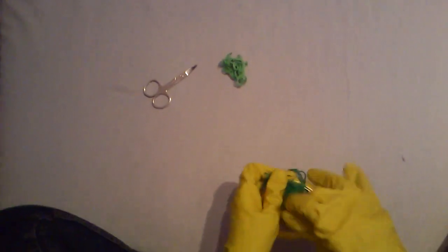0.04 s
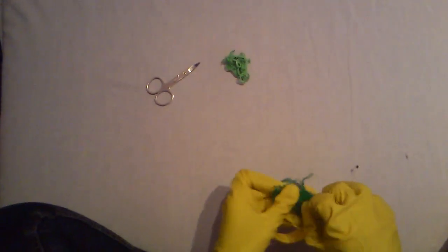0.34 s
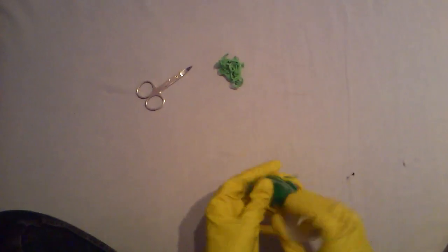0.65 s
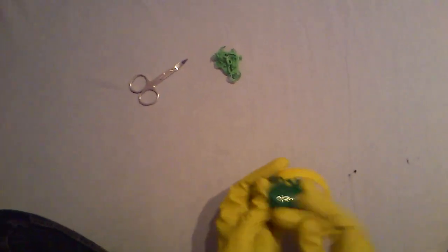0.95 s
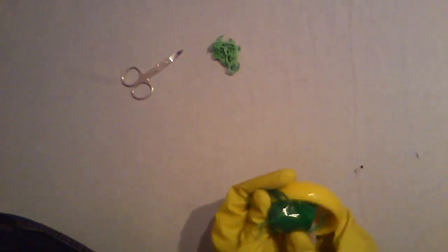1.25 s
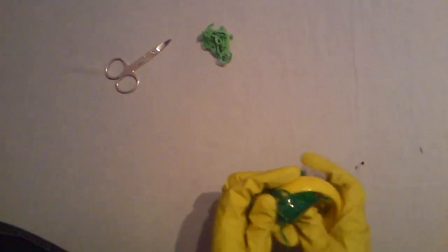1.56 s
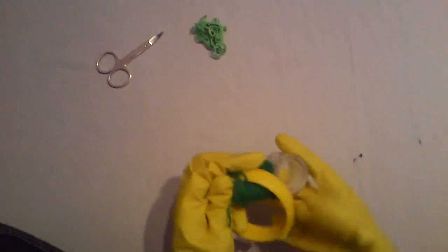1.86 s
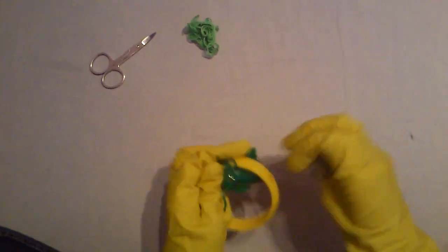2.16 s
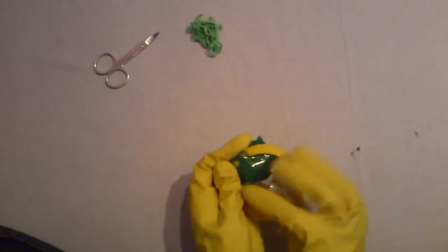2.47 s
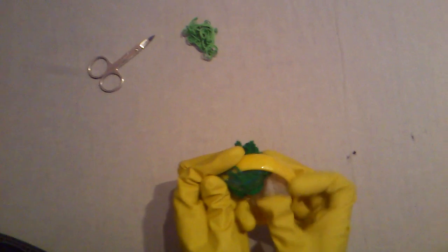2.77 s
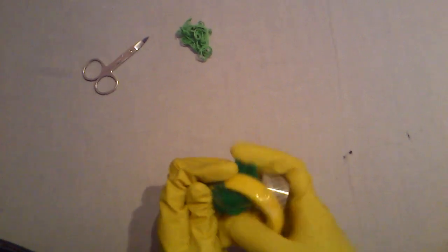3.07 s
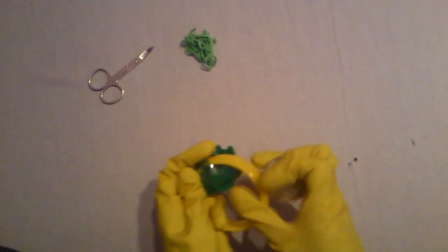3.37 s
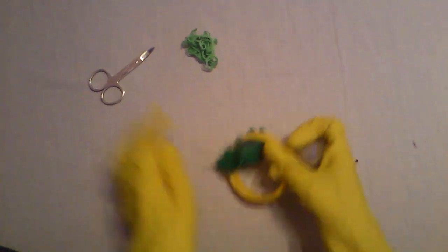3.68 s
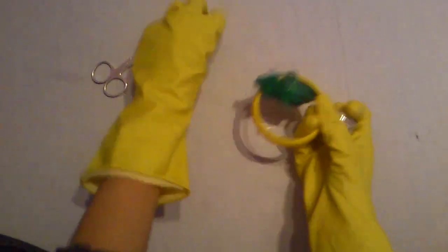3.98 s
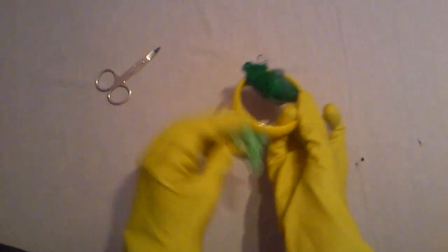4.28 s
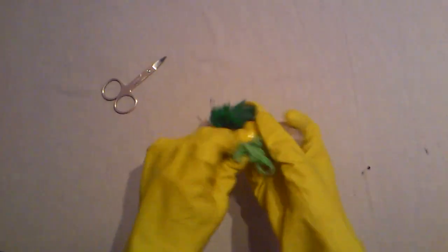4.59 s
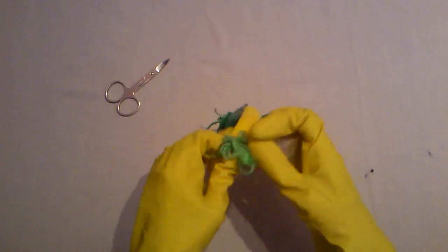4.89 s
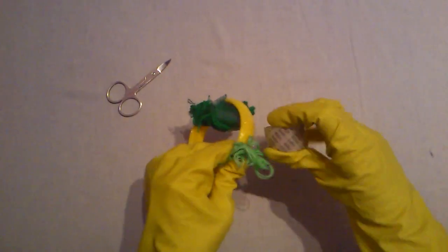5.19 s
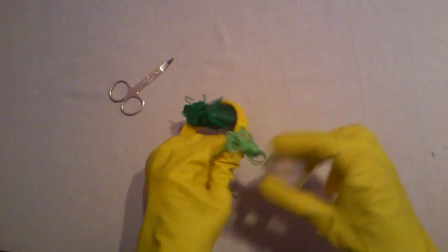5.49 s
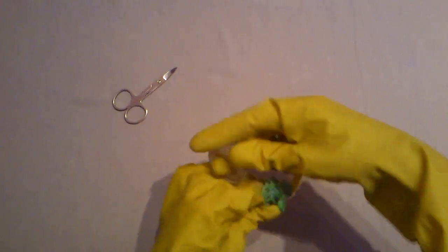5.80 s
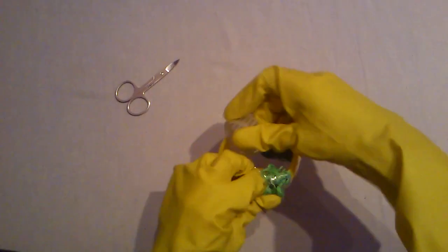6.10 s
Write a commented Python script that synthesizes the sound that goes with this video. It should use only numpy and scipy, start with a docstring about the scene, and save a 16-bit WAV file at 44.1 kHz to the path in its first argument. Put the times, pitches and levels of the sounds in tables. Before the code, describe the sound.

Rubber-gloved hands work with sticky tape and a plastic ring close to the microphone, making bright, irregular snaps, many with a hollow note, over faint crinkling. It opens with a quick rubbery slip and several snaps, with light knocks around 0.7 seconds. Quieter ticks follow until a sharp snap at 1.8. At about 2.2 seconds tape comes off in a very short, jerky rip. Crisp cracks and stuttering glove slips cluster from 2.9 to 3.5. At 4 seconds a hand thuds softly on the cloth-covered table, followed by a lull with small ticks. The snaps build again from 5.2, with a second brief rip, falling in pitch, at 5.4 and a few more cracks until 5.7. Faint clicks finish at around 6.3 seconds. The small bare room adds a short echo, with steady low rumble, hiss and a faint hum underneath.

```python
"""Rubber gloves and sticky tape

A small bare room, a near-coincident stereo microphone at a cloth-covered table. Gloved hands bind
thread to a plastic ring with tape. Rubber and tape stick and let go: runs of slips, a faint crinkle,
single snaps and two longer rips, each a bright crack plus the hollow note of a fold. The hands knock
on ring and table, once while reaching for more thread. Ceiling and walls answer over a low room tone."""
import sys
import numpy as np
from scipy import signal
from scipy.fft import rfft, irfft
from scipy.io import wavfile
from scipy.ndimage import uniform_filter1d

SR = 44100
rng = np.random.default_rng(int(sys.argv[2]) if len(sys.argv) > 2 else 0)


def put_to_file(sound):
    """Save the sound as 16-bit audio at rate SR, in the file named by the first command-line argument."""
    columns = np.atleast_2d(sound).T  # one column per channel
    safe = np.clip(columns, -1, 1)
    whole_steps = np.round(safe * 32767)
    wavfile.write(sys.argv[1], SR, whole_steps.astype(np.int16))


N = 279594
LEAD, GRAIN = SR // 10, 1024  # samples: run-in before t = 0, length of one release


def undb(db):
    """Decibels to gain."""
    return 10 ** (np.asarray(db) / 20)


def on_log_axis(hz, points, values):
    """Join the points of a spectrum by straight lines on a log-frequency axis."""
    return np.interp(np.log(hz + 1), np.log(points), values)


def resonance(hz, centre, q):
    """Response of a two-pole band-pass, gain 1 at the centre."""
    s = 1j * hz / centre
    return s / q / (1 + s / q + s * s)


def minimum_phase(db):
    """Causal response with the given gains, so nothing rings ahead of a crack."""
    cepstrum = irfft(np.log(undb(db)))
    half = cepstrum.shape[-1] // 2
    cepstrum[..., 1:half] *= 2
    cepstrum[..., half + 1:] = 0
    return np.exp(rfft(cepstrum))


def place(times, grains):
    """Lay short sounds on a track that starts LEAD samples early."""
    track = np.zeros(LEAD + N + GRAIN)
    for i, grain in zip(np.clip(times * SR + LEAD, 0, LEAD + N).astype(int), grains):
        track[i:i + GRAIN] += grain
    return track[:LEAD + N]


# Noise floor at the microphone: f/Hz, relative density/dB
NOISE_FLOOR = [(12, -24), (20, 1.5), (65, -0.5), (215, -7), (620, -10.5), (969, -17), (1110, -13.5),
               (1250, -18.5), (1350, -18.5), (2180, -18), (2500, -18), (3400, -27.5), (4020, -20.5),
               (8790, -32), (15800, -33)]


def room_tone(noise_db=-54.5, hum_hz=175, hum_db=-67.5):
    """Steady low rumble, microphone hiss and a faint hum."""
    hz = np.fft.rfftfreq(N, 1 / SR)
    colour = undb(on_log_axis(hz, *np.transpose(NOISE_FLOOR)))
    noise = irfft(rfft(rng.standard_normal(N)) * colour, N)
    hum = np.sqrt(2) * np.sin(2 * np.pi * hum_hz * np.arange(N) / SR)
    return undb(noise_db) * noise / noise.std() + undb(hum_db) * hum


def release(response, db, peel_s, jolt, ripple):
    """A jolt and a brief peeling noise through each response, direct and diffuse; db is rms over 5 ms."""
    peel = rng.standard_normal((len(db), GRAIN)) * np.exp(-(np.arange(GRAIN) / SR / peel_s) ** 2)
    # the walls gather sound from all directions, which evens out much of the ripple of any one path
    grains = np.array([irfft((jolt + share * rfft(peel)) * response) for share in (1, ripple)])
    power = np.sum(grains ** 2, axis=-1, keepdims=True) / (.005 * SR)
    return grains * undb(db) / np.sqrt(power)


# Spectrum of taut skin cracking: f/Hz, relative level/dB
SKIN_SPECTRUM = [(300, -55), (700, -12), (1300, -11), (2400, -8.5), (3500, -10.5), (4800, -4), (6500, -1.5),
                 (8500, -7), (11000, -20.5), (15500, -37)]


def skin_and_fold(rows, taut_db=2, taut_q=6, fold_q=5.03, leak_db=-22):
    """Each row (as in SINGLE_SNAPS) cracks taut skin and rings a slack fold: direct sound, room send."""
    t, crack_db, crack_hz, tilt_db, fold_db, fold_hz, send_db = np.asarray(rows, float).T[:, :, None]
    hz = np.arange(GRAIN // 2 + 1) * SR / GRAIN
    octaves = np.log2(np.clip(hz, 2300, 11000) / 6000)
    skin = minimum_phase(on_log_axis(hz, *np.transpose(SKIN_SPECTRUM)) + tilt_db * octaves)
    skin = skin * (1 + undb(taut_db) * resonance(hz, crack_hz, taut_q))
    # a fold is too small to radiate much below its own note
    radiated_power = 1 / (1 + (.65 * fold_hz / (hz + 60)) ** 6) + undb(2 * leak_db)
    radiation = minimum_phase(10 * np.log10(radiated_power))
    fold = resonance(hz, fold_hz, fold_q) * resonance(hz, fold_hz, q=0.16) * radiation
    cracks = release(skin, crack_db, peel_s=0.003, jolt=3.86, ripple=0.29)
    notes = release(fold, fold_db, peel_s=0.0034, jolt=3.7, ripple=0.4)
    direct, diffuse = cracks + notes
    return np.array([place(t[:, 0], direct), place(t[:, 0], diffuse * undb(send_db))])


# Glove drags; those facing away from the microphone arrive mostly through the room:
# t/s, length/s, slip rate/Hz, first level/dB, last level/dB, crack f/Hz, tilt/(dB per octave),
# fold over crack/dB, fold f/Hz, room send/dB
GLOVE_DRAGS = [(-.03, 0.045, 510, -26.5, -41, 5600, -1, -17, 1800, 8.5),
               (0.255, 0.014, 443, -64, -35, 4050, -7, -14, 1540, 8.5),
               (0.444, 0.011, 303, -51, -51, 5960, 1, 3.5, 2400, 10),
               (0.702, 0.055, 310, -38.5, -41, 4000, -3, -25, 1380, 6.5),
               (1.6562, 0.024, 120, -41.5, -32, 8000, 17, -4.5, 1980, -1),
               (2.156, .019, 530, -24.5, -20, 5700, -2.5, -4, 1650, 2),
               (2.92, 0.017, 225, -33.5, -18.5, 7000, 1, -10, 1940, 1.5),
               (3.1403, 0.053, 63, -31, -22, 6400, -2, -24, 1950, -3.5),
               (3.216, 0.031, 440, -32, -32, 5600, 0, -11, 2110, -1),
               (3.3684, .017, 244, -23, -21.5, 6540, 5, -12, 2600, -0.5),
               (5.2004, .016, 215, -24, -22, 4523, 3.5, -28, 2110, 0.5),
               (5.2345, 0.011, 217, -24, -29.5, 6826, 8, -9, 2640, -8),
               (5.3173, .031, 119, -24.5, -28, 6440, 3.5, -8, 2540, -2.5),
               (5.3587, .017, 160, -23, -21.5, 6300, 5, -10, 2560, -3),
               (5.726, 0.015, 353, -42, -31.5, 4310, -20, 1.5, 680, -2),
               (5.728, .025, 657, -32.5, -28.5, 4270, -3.5, -10, 1062, 7)]


def drags(uneven_s=.0006, scatter_db=1.5):
    """Rubber sticks and slips: a quick, uneven run of releases for each drag."""
    slips = []
    for start, length, rate, first_db, last_db, crack_hz, tilt, fold_db, fold_hz, send in GLOVE_DRAGS:
        chance = rng.standard_normal((40, 4))
        for k, (late, size, taut, slack) in enumerate(chance[:int(length * rate) + 1]):
            t = start + k / rate + uneven_s * late
            db = first_db + (last_db - first_db) * k / (length * rate) + scatter_db * size
            slips.append((t, db, crack_hz * np.exp(0.16 * taut), tilt,
                          db + fold_db, fold_hz * np.exp(0.02 * slack), send))
    return skin_and_fold(slips)


# Spells of light finger work over the table: t/s, length/s, relative level/dB
FINGER_WORK = [(0, 0.51, -45.5), (0.874, 0.25, -53.5), (1.327, 0.43, -50), (1.947, 0.77, -49.5),
               (3.0, 0.27, -49.5), (3.66, 0.048, -50.5), (4.062, 0.17, -54.5), (4.412, 0.3, -56),
               (4.876, 0.15, -54), (5.552, 0.43, -50), (6.054, 0.076, -50)]


def crinkle(count=600, fade_s=0.033, rest_db=-63.5, scatter_db=5.5, fold_db=-6, send_db=2.0):
    """Many tiny releases of every pitch, swelling with each spell and barely there as the fingers rest."""
    late, size, taut, slack, hollow = rng.standard_normal((count, 5)).T
    t = (np.arange(count) + .5 * late) / count * N / SR
    start, length, spell_db = np.transpose(FINGER_WORK)[:, :, None]
    resting = np.clip(np.maximum(start - t, t - start - length) / fade_s, 0, 1)
    busy_db = np.max(spell_db + (rest_db - spell_db) * resting, axis=0)
    db = busy_db + scatter_db * np.minimum(size, 2) - 6
    crack_hz, tilt = 5600 * np.exp(0.23 * taut), 4.7 * taut - 1  # tauter is higher and brighter
    fold_hz = 1300 * np.exp(0.54 * slack)
    columns = [t, db, crack_hz, tilt, db + fold_db + 3 * hollow, fold_hz, np.full(count, send_db)]
    return skin_and_fold(np.column_stack(columns))


# Rubber or tape letting go over the table:
# t/s, crack level/dB, crack f/Hz, tilt/(dB per octave), fold level/dB, fold f/Hz, room send/dB
SINGLE_SNAPS = [(0.2037, -29.5, 7200, -2, -37.5, 2500, 1), (0.2525, -29.5, 5620, 0, -24, 1390, -2.5),
                (0.3683, -45, 5810, 4, -48, 2210, 4), (0.4471, -36, 6170, 11, -36, 1190, 2.5),
                (0.6327, -26.5, 5620, -6, -34, 1520, 1.5), (0.6931, -26, 6650, 5, -27, 1480, -2),
                (0.7288, -49, 4910, -6, -25, 1180, -3), (0.7382, -25.5, 4090, -9, -32, 2060, -4),
                (1.057, -51, 7040, 5, -49, 1840, 2), (1.1212, -65, 6900, -4, -39, 1050, -1),
                (1.3195, -48, 4260, -20, -44, 1350, -1), (1.3538, -43, 4870, -5, -52, 1870, -1.5),
                (1.4147, -38.5, 6500, 3, -57, 1910, 1), (1.5242, -43.5, 6350, -4, -53, 1890, 1.5),
                (1.5816, -33.5, 7450, -3, -42.5, 1930, 2), (1.5918, -33, 6330, -4.5, -49, 1950, 1),
                (1.8226, -50, 4500, 0, -35, 2300, -5.5), (1.8318, -22.5, 4100, -6.5, -28, 1500, -1.5),
                (2.0606, -27.5, 4284, -5, -34.5, 1947, -0.5), (2.1100, -24.5, 3440, 1, -22.5, 1860, -3.5),
                (2.1211, -21, 3510, -3, -27, 1880, 0), (2.428, -29, 6270, 11, -37, 2100, -.5),
                (2.5511, -40.5, 6050, -6, -51, 915, -12), (2.5712, -48, 5900, 2, -45.5, 1920, 1),
                (2.791, -49.5, 5330, -1, -57, 1930, 5.5), (2.8663, -40.5, 5230, -1.5, -63, 1748, -1),
                (2.91, -41, 5430, -5, -52, 1900, -1), (2.94, -16.5, 7300, -5, -38, 1980, -8.5),
                (3.0820, -37, 4540, -6, -63, 1850, 2.5), (3.1287, -23, 5556, 0.5, -29.5, 1710, -.5),
                (3.1617, -22, 6060, 2, -47, 1703, 0.5), (3.3615, -26, 6686, 3, -59, 2060, 5),
                (3.5315, -30, 5030, -0.5, -30, 2440, -2.5), (3.6706, -44, 4840, -1.5, -53, 2016, -3.5),
                (4.0018, -41, 3830, -22, -39.5, 750, 0), (4.119, -43, 4360, -23, -47.5, 2100, 0.5),
                (4.7636, -47, 5500, -8.5, -51, 1940, -0.5), (4.9187, -32.5, 6750, 6, -68, 2730, -8),
                (4.9331, -32.5, 6740, 8.5, -58, 1413, 2.5), (5.0220, -54, 8050, 4, -44, 1670, -2),
                (5.1171, -35.5, 6650, 2, -68, 1880, -2.5), (5.1575, -58, 6038, 0, -43.5, 1862, 2),
                (5.1855, -36, 6900, 7, -46, 1798, 8), (5.4059, -18.5, 5600, 3, -40, 1790, 8.5),
                (5.5095, -23.5, 5420, 1, -27.5, 925, -9), (5.5825, -23, 6100, 3, -35, 740, -4.5),
                (6.186, -38, 6450, -0.5, -68, 2000, -3), (6.2838, -36.5, 5100, -5, -38.5, 1850, -3.5)]


def snaps(creak_lead_s=.008, creak_db=-23.5):
    """The rubber gives a little with a faint creak, then snaps free."""
    creaks = np.array(SINGLE_SNAPS, float)
    creaks[:, 0] -= creak_lead_s
    return skin_and_fold(SINGLE_SNAPS) + undb(creak_db) * skin_and_fold(creaks)


# Soft knocks of the hands on ring and table: t/s, level/dB, f/Hz, t60/s
HAND_KNOCKS = [(0.369, -30, 170, 0.0094), (0.633, -28, 580, 0.021), (0.694, -25.5, 650, 0.018),
               (1.011, -37.5, 280, .022), (1.651, -31.5, 110, 0.017), (2.187, -27.5, 417.3, 0.027),
               (2.205, -33, 320, 0.034), (2.543, -36.5, 570, 0.02), (2.687, -39.5, 670, .02),
               (3.566, -30.5, 360, 0.0072), (3.685, -34, 260, 0.026), (3.74, -35, 40, 0.27),
               (3.989, -25, 102, 0.068), (3.997, -23.5, 266, 0.028), (4.002, -27, 24.4, 0.45),
               (4.019, -30.5, 45.3, 0.25), (4.85, -36, 410, 0.01), (5.165, -40.5, 610, 0.029),
               (6.133, -34.5, 200, 0.015)]


def knocks(send_db=-3.0):
    """Ring and padded table thud and sway: one damped sine for each row."""
    t = np.arange(-LEAD, N) / SR
    thuds = 0
    for start, db, hz, t60 in HAND_KNOCKS:
        age = np.maximum(t - start, 0)
        decay = np.exp(-np.log(1000) * np.minimum(age / t60, 10))
        thuds = thuds + undb(db) * np.sin(2 * np.pi * hz * age) * decay
    return np.array([thuds, thuds * undb(send_db)])


# Tape pulled off its roll: t/s, length/s, jerk rate/Hz, jerk length/s, crack level/dB,
# fold over crack/dB, first fold f/Hz, last fold f/Hz, leak below the fold/dB, room send/dB
TAPE_RIPS = [(2.1754, 0.056, 88.5, .001, -17, 2.5, 1180, 924, -17, -4.5),
             (5.4132, 0.0843, 82, .006, -21, -8, 1926, 900, -36, -2)]


def rips(slips_per_s=650, crack_hz=6450, tilt=0, uneven_s=.0003, scatter_db=1, sag_share=0.19):
    """Tape comes off in jerks, each one slip or a few; as the freed strip grows, its note sinks."""
    out = 0
    for start, length, rate, jerk_s, crack_db, fold_db, first_hz, last_hz, leak_db, send in TAPE_RIPS:
        jerks = np.arange(0, length, 1 / rate)
        ages = (jerks[:, None] + np.arange(0, jerk_s, 1 / slips_per_s)).ravel()
        slips = []
        for age, (late, size, taut, slack) in zip(ages, rng.standard_normal((80, 4))):
            db = crack_db + scatter_db * size
            strip_hz = last_hz + (first_hz - last_hz) * np.exp(-age / length / sag_share)
            slips.append((start + age + uneven_s * late, db, crack_hz * np.exp(0.1 * taut), tilt,
                          db + fold_db, strip_hz * np.exp(0.023 * slack), send))
        out = out + skin_and_fold(slips, fold_q=5.1, leak_db=leak_db)
    return out


# What the bare walls give back: f/Hz, relative level/dB, t60/s
WALL_BANDS = [(150, -1, 0.61), (500, -7, 0.41), (1080, -8.5, 0.49), (2350, 0.5, 0.39), (3480, 6.5, 0.33),
              (6320, -5, 0.33), (8550, -5.5, 0.26), (15350, 1, 0.21)]
# Notes that linger in the room: f/Hz, level/dB
ROOM_MODES = [(896, -29), (981, -26), (1194, -25.5), (2890, -29.5), (4030, -41)]


def room(send, ceiling_s=.0089, ceiling_db=-7, walls_db=-1, build_s=0.0034, modes_t60=0.29):
    """The ceiling answers first, by a path 3 m longer; wall echoes build and die, the treble soonest."""
    t = np.arange(SR * 3 // 4) / SR
    hz = np.fft.rfftfreq(len(t), 1 / SR)
    points, dbs, t60s = np.transpose(WALL_BANDS)
    swell = np.clip((t - ceiling_s) / build_s, 0, 1)

    def envelope(t60):
        return swell * np.exp(-np.log(1000) * t / t60)

    noise = rng.standard_normal(len(t))
    # many paths overlap, so the echoes are even in colour over any broad band
    power = np.abs(rfft(noise * envelope(t60s.mean()))) ** 2
    echoes = rfft(noise) / np.sqrt(uniform_filter1d(power, size=120) / power.mean())
    response = np.zeros(len(t))
    for share, db, t60 in zip(np.eye(len(points)), dbs, t60s):
        fade = envelope(t60)
        band = irfft(echoes * on_log_axis(hz, points, share), len(t))
        response += undb(db + walls_db) * band * fade / np.linalg.norm(fade)
    for mode_hz, db in ROOM_MODES:
        ring = np.sin(2 * np.pi * mode_hz * t) * envelope(modes_t60)
        response += undb(db) * ring / np.linalg.norm(ring)
    response[int(ceiling_s * SR)] += undb(ceiling_db)
    return signal.fftconvolve(send, response)[:len(send)]


# How far the two channels part: f/Hz, side over mid/dB
SIDE_SPECTRUM = [(30, -47), (250, -46), (600, -54), (1200, -45.5), (2200, -34), (4500, -75), (8000, -28),
                 (14000, -13.5)]


def widen(mid):
    """Nearly mono: the two channels part only faintly, a quarter-cycle out of phase, most in the high treble."""
    hz = np.fft.rfftfreq(N, 1 / SR)
    width = undb(on_log_axis(hz, *np.transpose(SIDE_SPECTRUM)))
    side = irfft(1j * rfft(mid) * width, N)
    return np.array([mid + side, mid - side])


def scene():
    """The handwork and the room around it, heard from the microphone at the table."""
    direct, send = snaps() + drags() + rips() + crinkle() + knocks()
    return widen((direct + room(send))[LEAD:] + room_tone())


def record(dry, top_hz=15750):
    """The recorder clips at full scale and cuts the top."""
    low_pass = signal.ellip(10, .2, 80, top_hz, fs=SR, output="sos")
    return signal.sosfilt(low_pass, np.clip(dry, -1, 1))


dry = scene()
out = record(dry)
put_to_file(out)
```